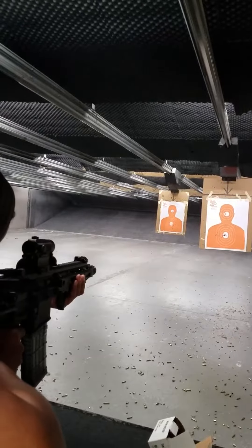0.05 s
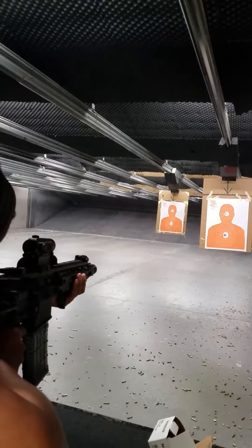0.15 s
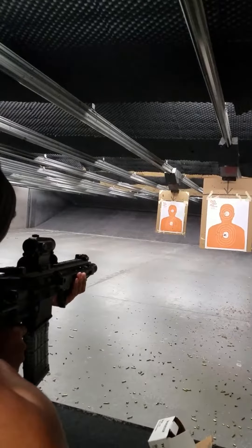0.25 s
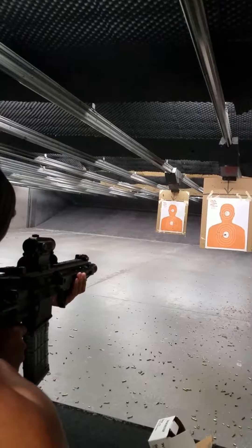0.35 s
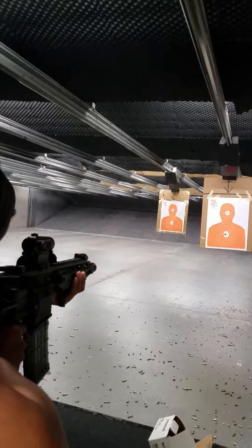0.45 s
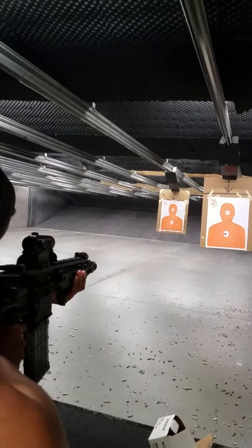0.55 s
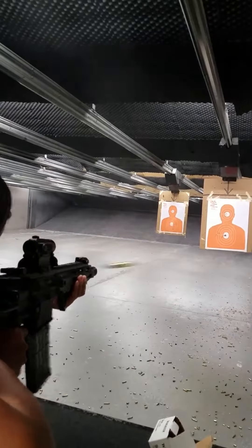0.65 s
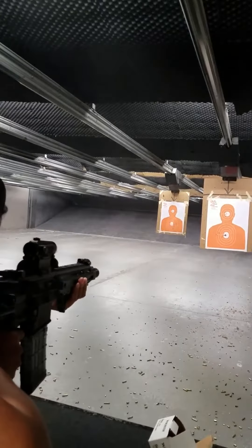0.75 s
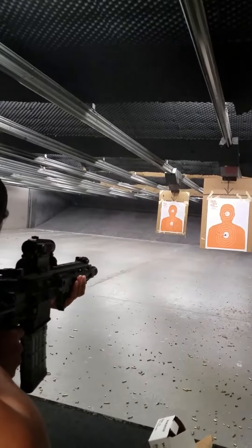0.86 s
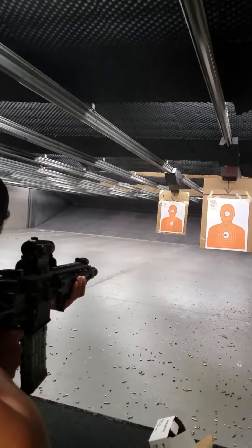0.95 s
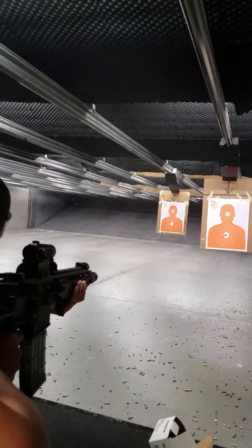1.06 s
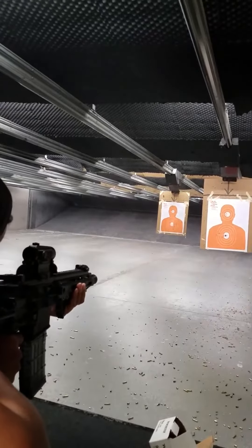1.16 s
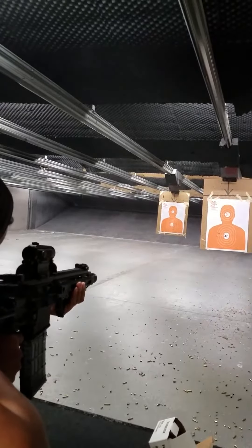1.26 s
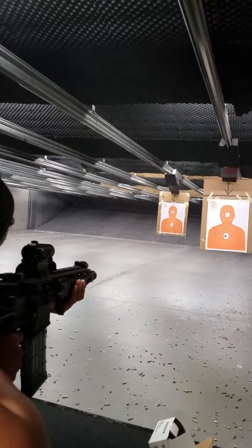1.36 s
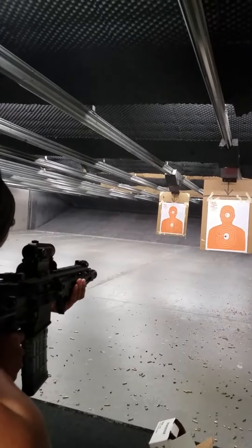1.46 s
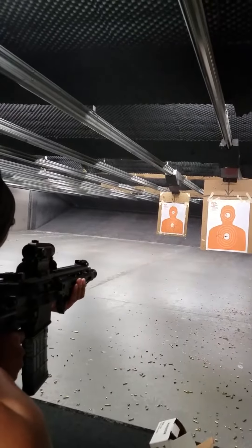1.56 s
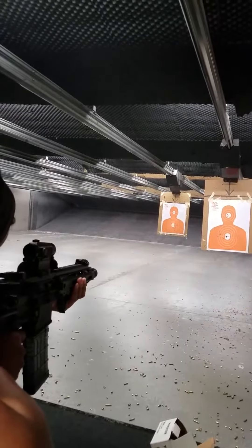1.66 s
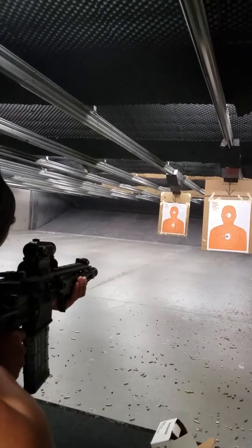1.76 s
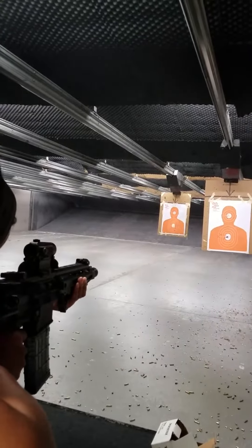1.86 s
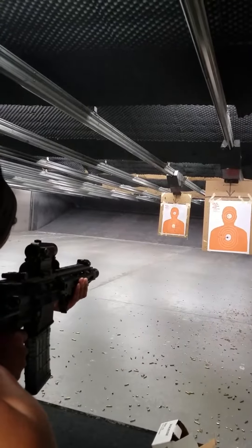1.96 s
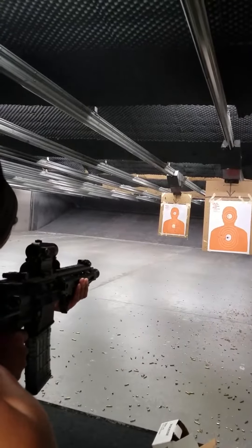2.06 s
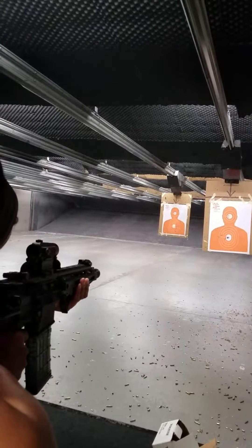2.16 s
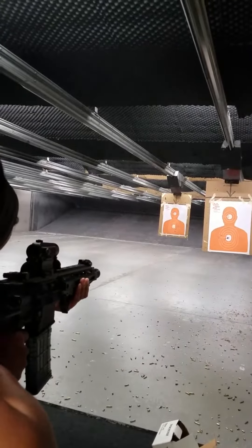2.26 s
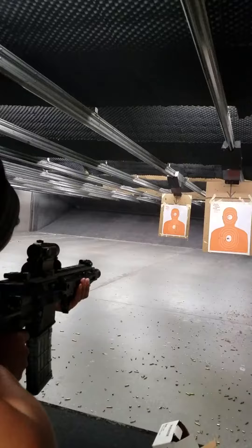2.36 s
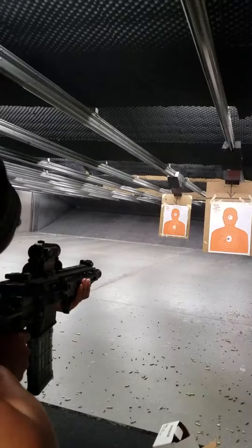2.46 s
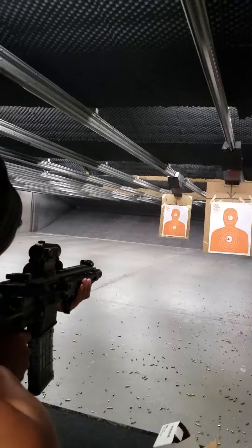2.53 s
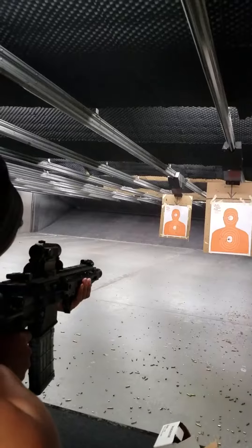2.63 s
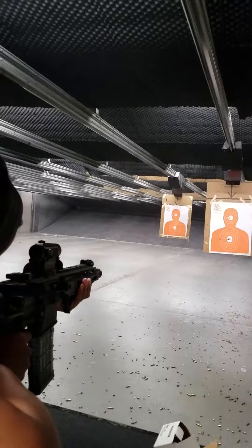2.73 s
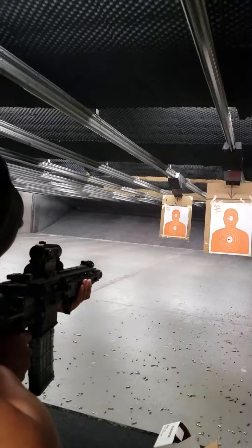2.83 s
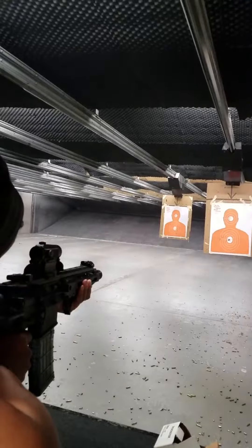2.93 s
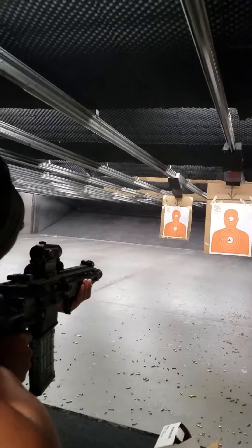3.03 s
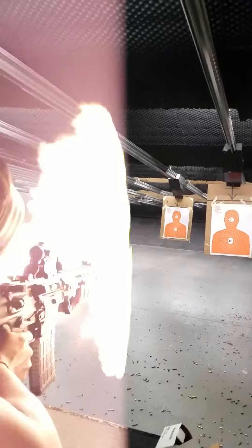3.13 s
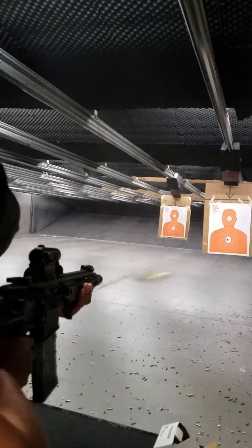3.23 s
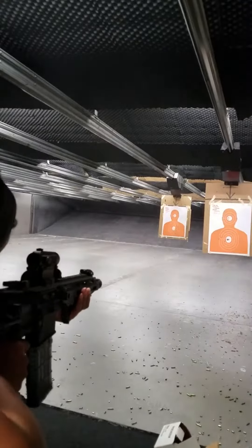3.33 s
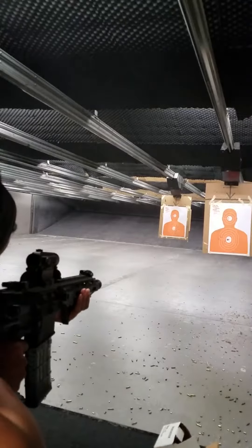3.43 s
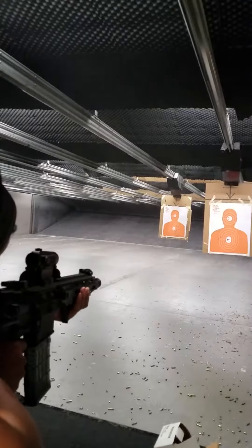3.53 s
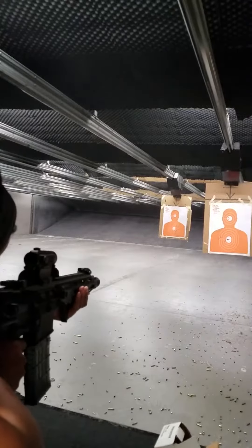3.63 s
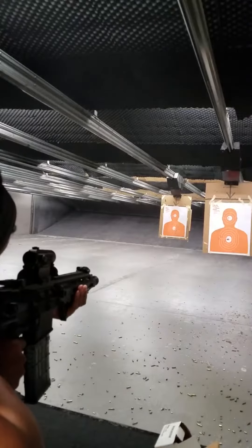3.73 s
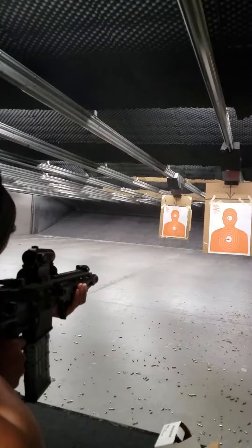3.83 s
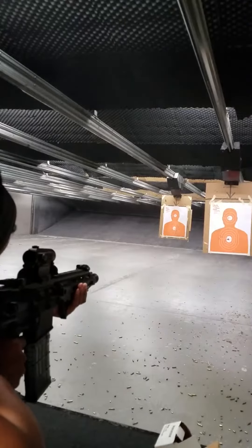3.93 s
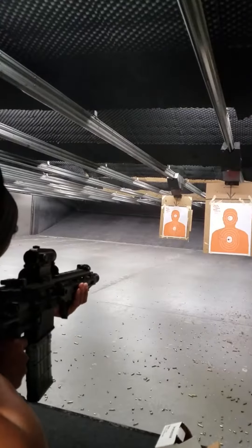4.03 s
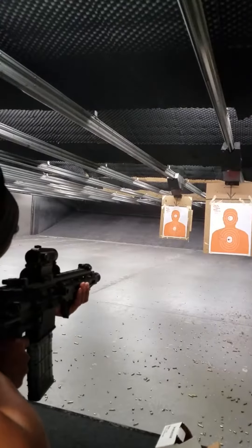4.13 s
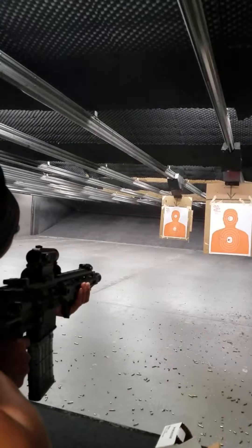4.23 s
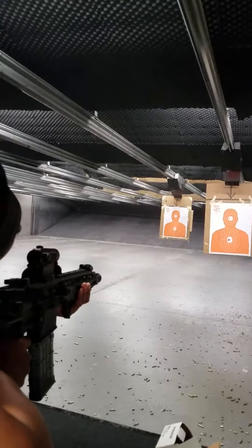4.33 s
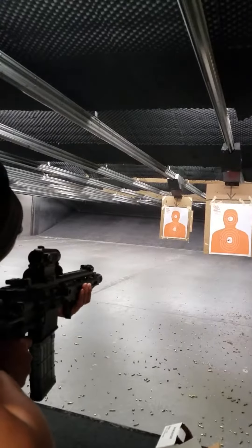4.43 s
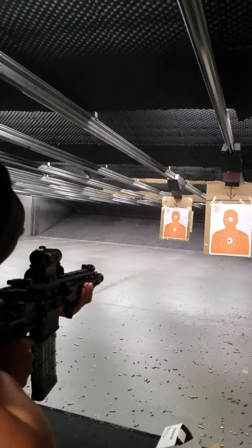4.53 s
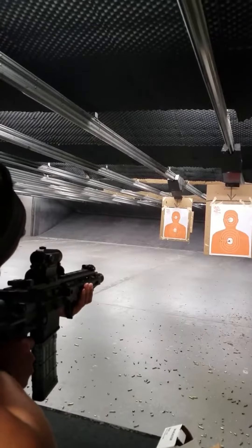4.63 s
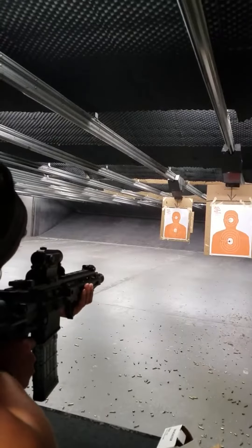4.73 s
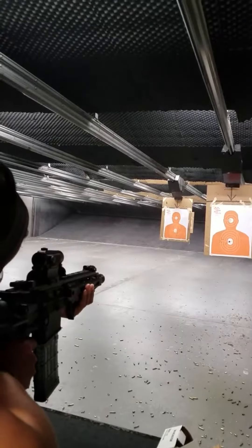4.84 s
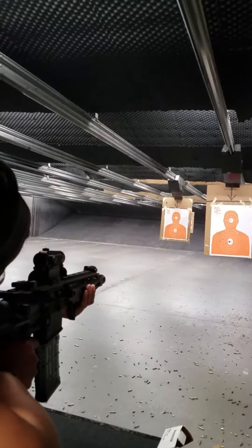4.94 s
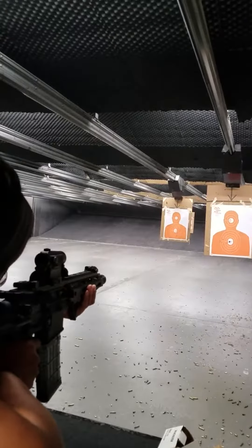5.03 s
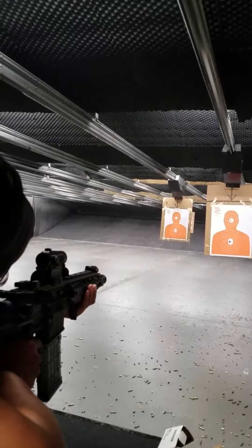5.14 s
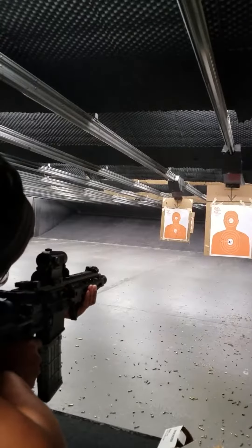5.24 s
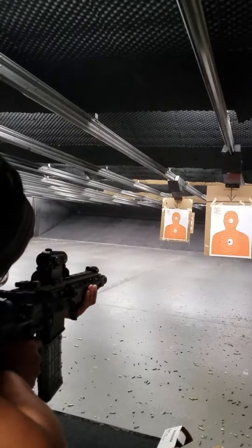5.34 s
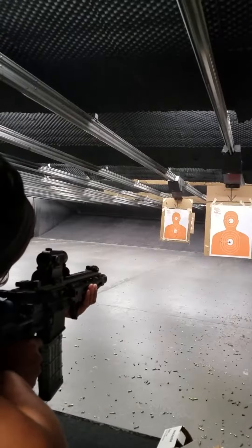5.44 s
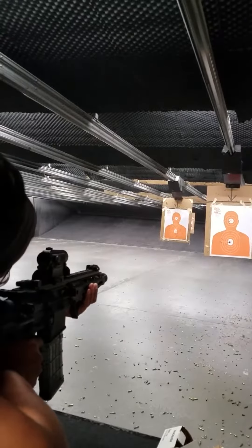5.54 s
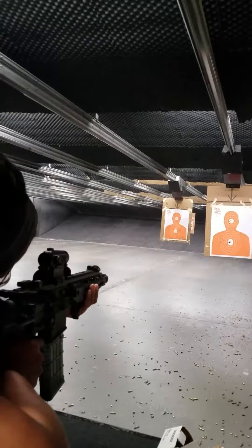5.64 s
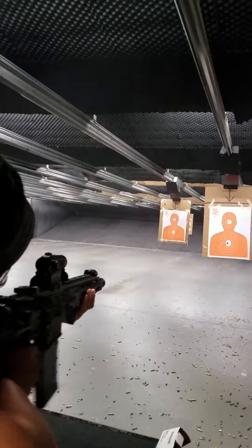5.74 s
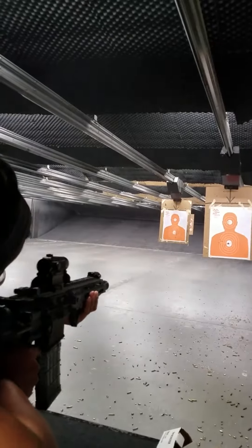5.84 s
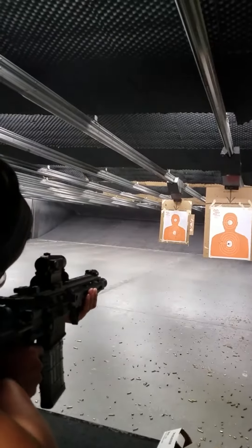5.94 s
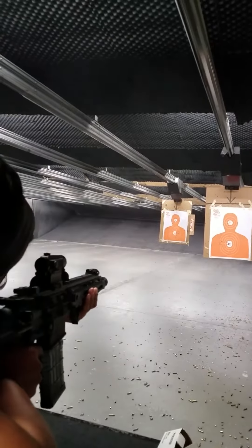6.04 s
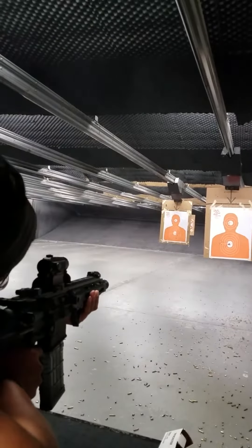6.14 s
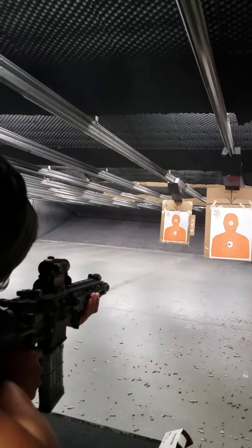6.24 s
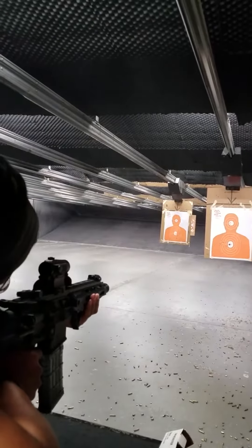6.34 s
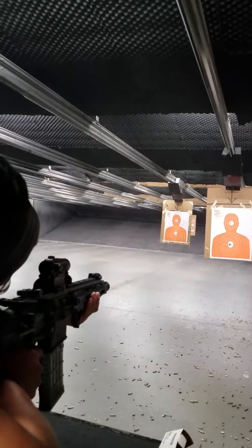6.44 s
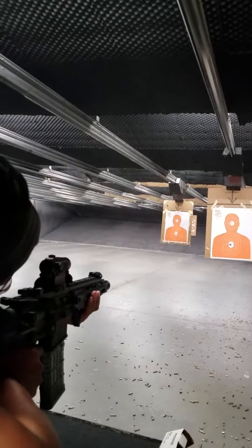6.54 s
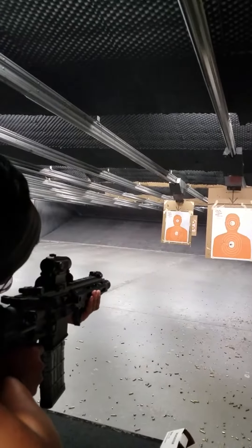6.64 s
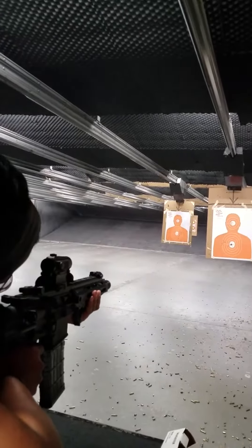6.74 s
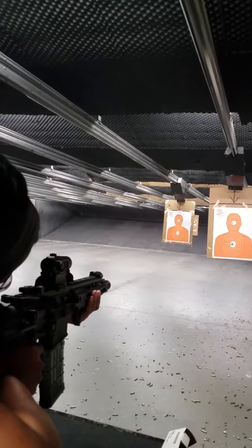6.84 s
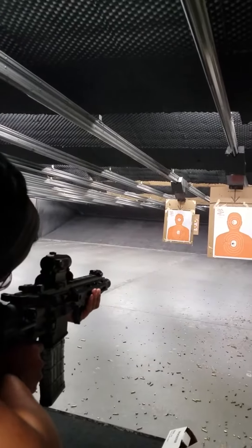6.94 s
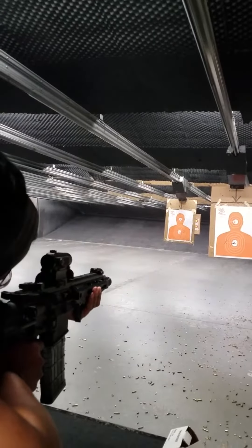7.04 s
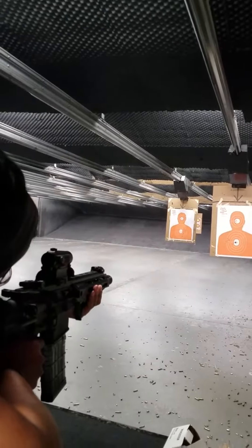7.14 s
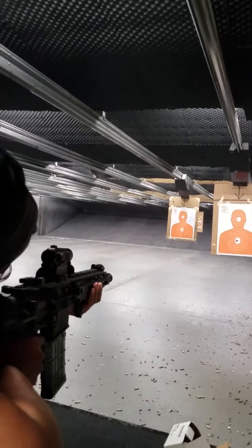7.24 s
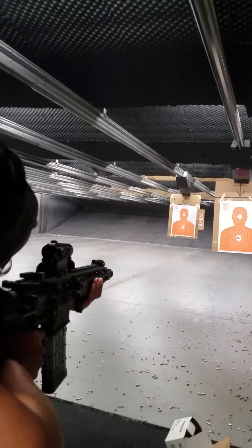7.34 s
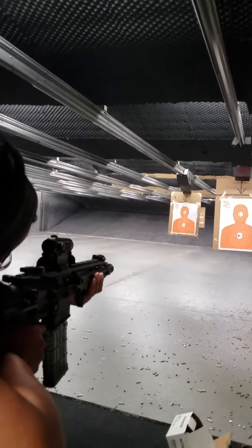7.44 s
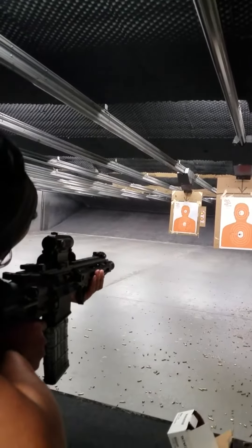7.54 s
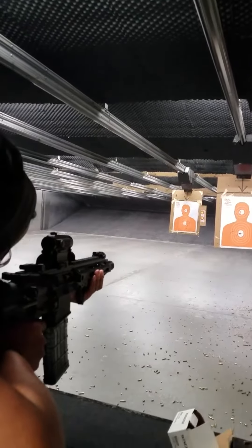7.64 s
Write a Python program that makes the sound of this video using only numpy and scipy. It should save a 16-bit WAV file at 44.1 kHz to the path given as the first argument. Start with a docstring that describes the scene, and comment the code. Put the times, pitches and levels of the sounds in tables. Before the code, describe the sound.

Single rifle-like shots fired well apart in an enclosed hall, overloaded and reverberant, followed by small gun clicks and spent cases ringing on concrete.

```python
"""Pistol shots in an indoor range

Three slow shots from a rifle-style pistol in a long concrete hall, heard from just behind the shooter.
Blast, echoes and steel are shaped, decaying noise; clacks are short noise bursts; brass cases ring as sines.
Each blast overloads the microphone and rolls down the hall; the gain control ducks, then lets the ringing
room and the ventilation, a fluttering noise, swell back."""
import sys
import numpy as np
from scipy import signal
from scipy.fft import rfft, irfft
from scipy.io import wavfile
from scipy.ndimage import uniform_filter1d, minimum_filter1d

SR = 44100
rng = np.random.default_rng(int(sys.argv[2]) if len(sys.argv) > 2 else 0)


def generate_wav(sig):
    """Save sig (samples, or channels by samples) to the path in sys.argv[1] as 16-bit PCM at SR."""
    pcm = np.round(np.clip(np.atleast_2d(sig).T, -1, 1) * 32767).astype(np.int16)
    wavfile.write(sys.argv[1], SR, pcm)


N = 338688
TIME = np.arange(N) / SR   # seconds
TAIL = TIME[:3 * SR]   # time span of a report and its reverberation
SHORT = TIME[:SR // 2]   # time span of a small contact

# The shots. Each row: start in seconds, strength in dB, extra bass in dB.
SHOTS = [(0.5205, 0.97, -1.5), (3.071, 0.27, 3), (5.602, 1, -1.5)]
# Muzzle blast scattered by the booth. Each row: frequency in Hz, relative level per Hz in dB.
BLAST_SPECTRUM = [(30, -10), (90, -15), (200, -8.5), (450, -1.5), (1000, 4.5), (1900, 4), (3600, -4.5),
                  (5500, -13), (7500, -11.5), (9500, -25), (12500, -15), (15500, -17.5)]
BLAST_DB, BLAST_T60_S, BLAST_LIKENESS = 20.5, 0.29, 0.1
# The blast and its returns from the ceiling baffles. Each row: delay in seconds, level in dB, rise in seconds.
BLAST_RETURNS = [(0, 0, 0.0026), (.108, -10, 0.0054), (.135, -7.5, 0.019), (.178, -12.5, .015),
                 (.262, -32, .005)]
# The direct shock front, a low punch and a sharp crack. Each row: frequency in Hz, relative level per Hz in dB.
SHOCK_SPECTRUM = [(40, -1), (150, -6), (330, 7.5), (1000, 4.5), (3000, -2.5), (7000, -5), (10000, -10.5),
                  (13500, -1.5), (16000, -9.5)]
SHOCK_DB, SHOCK_T60_S = 21.5, 0.15

# Reverberation of the hall. Each row: frequency in Hz, relative level per Hz in dB.
HALL_SPECTRUM = [(40, -29), (85, -22), (200, -16), (250, -11.5), (300, 0.5), (650, 1.5), (900, -4.5),
                 (1250, -3.5), (2200, -10), (4200, -14.5), (7300, -23.5), (9500, -34), (15000, -30.5)]
# Decay of the hall. Each row: frequency in Hz, time to fall by 60 dB in seconds.
HALL_T60 = [(60, 1.08), (150, 0.99), (330, 1.08), (600, 1.034), (1100, 1.466), (2200, 1.314), (4200, 1.043),
            (7500, 0.86), (14000, 0.55)]
# Standing waves between floor, ceiling and side walls. Each row: frequency in Hz, width in Hz,
# level over the reverberation in dB.
HALL_MODES = [(88, 12, -3.5), (147, 9, 13.5), (272, 9.9, 3), (347, 12, 2.5), (384, 12, -0.5), (473, 10, -5),
              (544, 14, -7), (578, 39, 1), (654, 21, 0)]
# Stereo spread of the hall. Each row: frequency in Hz, left-right likeness (correlation).
HALL_LIKENESS = [(60, 0.96), (300, 0.82), (600, 0.81), (1100, 0.58), (2200, 0.16), (4500, 0.037),
                 (14000, -0.43)]
HALL_DB, HALL_BUILD_S = 18.5, 0.15
HALL_REPEAT = 0.59   # power share of the echo pattern that all shots have in common
# The boom runs up and down the range and comes back in evenly spaced, ever shallower surges.
SURGE_FIRST_S, SURGE_EVERY_S, SURGE_DB, SURGE_T60_S = 0.095, 0.122, 3, 4.5
# The far end answers late with one broad swell.
SWELL_AT_S, SWELL_WIDTH_S, SWELL_DB = 0.4, 0.24, 3.5
# How strongly each band follows surges and swell. Each row: frequency in Hz, factor on their dB.
SURGE_SHARE = [(120, 2.7), (480, 0.78), (960, 0.14), (1900, 0.077), (4000, 0.44)]

# Steel rails and baffles that ring on after each shot. Each row: frequency in Hz, width in Hz, level in dB.
STEEL_MODES = [(590, 56, -4.5), (714.5, 58, 1), (800, 50, -3.5), (985, 48, -1.5), (1114, 67, 1.5),
               (1238, 71, -2), (1340, 91, -3), (1600, 260, -7.5)]
STEEL_DB, STEEL_T60_S, STEEL_LIKENESS = -9.5, 3.34, 0.75

# Trigger resets and knocks of the gun. Each row: start in seconds, click level in dB, thump level in dB.
CLACKS = [(1.144, -20, 1.5), (1.248, -32, -14), (3.681, -17, -15), (3.786, -17, -23), (6.182, -14, -10)]
# Steel click of the action. Each row: frequency in Hz, relative level per Hz in dB.
CLICK_SPECTRUM = [(800, -4), (2500, 20), (7000, -10), (9500, -24), (13000, -10), (16000, -11)]
# Dull thump of the gun body. Each row: frequency in Hz, relative level per Hz in dB.
THUMP_SPECTRUM = [(60, -49), (150, -34), (215, 6.5), (400, 3), (1200, -11.5), (3500, -20), (9000, -68)]
CLICK_T60_S, THUMP_T60_S = 0.087, 0.054

# Wall modes of three brass cases, one list per case. Each row: frequency in Hz, level in dB,
# time to fall by 60 dB in seconds.
CASES = [
    [(10600, -8.5, 0.3), (15000, -3, 0.24), (14950, -2, 0.18), (15450, -7, .14)],
    [(10930, -8, 0.5), (15150, 7, 0.29), (15710, -7, 0.3)],
    [(11000, -18, .5), (15270, 1, 0.31), (15560, 1, 0.52)],
]
# Hard landings of the cases on concrete. Each row: start in seconds, case number, ring level in dB,
# tick level in dB, other end's relative level in dB, first hop in seconds, loss per hop in dB.
LANDINGS = [(1.815, 0, -18, -23.5, -15, .209, 25), (2.102, 0, -50, -39, 2, 0.084, 12),
            (2.177, 0, -42.5, -43, 2, 0.053, 5), (2.5086, 0, -51, -58, -10, .18, 7),
            (6.502, 1, -38, -29, -6, 0.22, 13), (6.891, 1, -40, -44, -8, 0.076, 7),
            (6.961, 1, -32, -51, -4, 0.078, 3), (7.16, 1, -41, -37.5, -4, .128, 11),
            (7.4798, 2, -34.5, -30, -1.5, 0.18, 5.5)]
# Tick of brass on the floor. Each row: frequency in Hz, relative level per Hz in dB.
TICK_SPECTRUM = [(1500, -13), (4500, 2.5), (7200, 6.5), (9500, -8), (13000, -1), (15500, -3)]
TICK_T60_S = 0.038
HOP_SHARE = 0.48   # each hop lasts this share of the one before
OTHER_END_S = 0.015   # the second end of a case comes down just after the first
BRASS_PAN_DB = -2   # left minus right: the cases are thrown out to the right

# Ventilation. Each row: frequency in Hz, relative level per Hz in dB.
AIR_SPECTRUM = [(25, 8), (45, 1), (68, -0.5), (110, -4), (195, -7.5), (350, -2), (600, -1.5), (800, -1),
                (1080, -2.5), (1450, -2), (2700, -6.5), (5500, -18.5), (7700, -26), (9100, -37.5),
                (12500, -33), (15500, -39)]
# Stereo spread of the ventilation. Each row: frequency in Hz, left-right likeness (correlation).
AIR_LIKENESS = [(60, 0.91), (300, 0.84), (600, 0.79), (1100, 0), (2200, 0), (4500, 0.06), (14000, 0)]
AIR_DB = -34

# Microphone and gain control
LIMIT_DB, OVERLOAD_DB = 10, 13
AGC_CEILING_DB, HOLD_S, RELEASE_DB_PER_S = -7, 0.72, 64
BALANCE_DB = -1.3   # left minus right
CUTOFF_HZ = 15900


def gunfire():
    """The muzzle hardly moves, so most of the echo pattern repeats; each charge has its own weight."""
    out = np.zeros((2, N))
    colour = hall_colour()
    lasting = reflections(colour)
    for start_s, strength_db, bass_db in SHOTS:
        fresh = reflections(colour)
        echoes = np.sqrt(HALL_REPEAT) * lasting + np.sqrt(1 - HALL_REPEAT) * fresh
        report = blast() + roll(echoes) + steel()
        add(out, start_s, from_db(strength_db) * bass_shelf(report, bass_db))
    return out


def blast(clump_db=1.0, clump_s=0.007):
    """The bright crack fills the booth at once and comes back from the baffles in softer clusters."""
    power = 0
    for delay_s, db, rise_s in BLAST_RETURNS:
        since = TAIL - delay_s
        envelope = from_db(db) * fade(since, BLAST_T60_S) * np.clip(since / rise_s, 0, 1)
        power = power + envelope ** 2
    clumps_db = clump_db * wander(len(TAIL), clump_s * SR)
    scattered = noise(from_db(at_hz(BLAST_SPECTRUM, bins(TAIL))), BLAST_LIKENESS)
    out = from_db(BLAST_DB + clumps_db) * np.sqrt(power) * scattered
    shock = burst(SHOCK_SPECTRUM, SHOCK_T60_S, likeness=0.44, rise_s=0.0006)
    add(out, 0, from_db(SHOCK_DB) * shock)
    return out


def bass_shelf(x, gain_db, corner_hz=260):
    """A gentle shelf lifts or lowers the weight of a report under the corner."""
    lows = signal.sosfilt(signal.butter(1, corner_hz, fs=SR, output="sos"), x)
    return x + (from_db(gain_db) - 1) * lows


def hall_colour(ripple_db=1.5, ripple_hz=22):
    """A few strong standing waves, and countless weaker ones that ripple the spectrum."""
    hz = bins(TAIL)
    ripple = ripple_db * wander(len(hz), ripple_hz / hz[1])
    return from_db(at_hz(HALL_SPECTRUM, hz) + ripple) * np.sqrt(1 + humps(HALL_MODES, hz))


def reflections(colour):
    """Echoes of the hall are so dense that they amount to coloured noise."""
    return noise(colour, at_hz(HALL_LIKENESS, bins(TAIL)))


def roll(echoes, lumpy_db=2.17, lump_s=0.014):
    """The reverberation builds up, comes in surges and lumps, and each octave dies at its own rate."""
    spectrum = rfft(echoes)
    centres = np.geomspace(60, 15360, 9)   # octave steps
    surge_db = surges()
    together = wander(len(TAIL), lump_s * SR)   # lumps shared by all octaves
    out = 0
    for hz, own in zip(centres, np.eye(len(centres))):
        # a triangular band that crossfades into its neighbours
        band = irfft(spectrum * at_hz(np.c_[centres, own], bins(TAIL)))
        lumps_db = lumpy_db * (together + wander(len(TAIL), lump_s * SR)) / np.sqrt(2)
        level_db = surge_db * at_hz(SURGE_SHARE, hz) + lumps_db
        out = out + band * fade(TAIL, at_hz(HALL_T60, hz)) * from_db(level_db)
    return from_db(HALL_DB) * out * (1 - np.exp(-TAIL / HALL_BUILD_S))


def surges():
    """Rise and fall of the boom in dB: round trips of the range on top of one broad swell."""
    trips = np.cos(2 * np.pi * (TAIL - SURGE_FIRST_S) / SURGE_EVERY_S) * fade(TAIL, SURGE_T60_S)
    swell = np.exp(-((TAIL - SWELL_AT_S) / SWELL_WIDTH_S) ** 2)
    return SURGE_DB * trips + SWELL_DB * swell


def steel():
    """Clusters of plate modes, rendered as narrow noise bands, outlast the reverberation."""
    # the summed power of the modes serves as amplitude, which sharpens the peaks
    ringing = noise(humps(STEEL_MODES, bins(TAIL)), STEEL_LIKENESS)
    return from_db(STEEL_DB) * ringing * fade(TAIL, STEEL_T60_S) * (1 - np.exp(-TAIL / HALL_BUILD_S))


def action():
    """A steel click with a dull thump from the body of the gun."""
    out = np.zeros((2, N))
    for start_s, click_db, thump_db in CLACKS:
        click = burst(CLICK_SPECTRUM, CLICK_T60_S, likeness=0.2)
        thump = burst(THUMP_SPECTRUM, THUMP_T60_S, likeness=0.37, rise_s=0.0021)
        add(out, start_s, from_db(click_db) * click)
        add(out, start_s, from_db(thump_db) * thump)
    return out


def brass():
    """Each touch of the floor ticks and sets the case ringing."""
    out = np.zeros((2, N))
    for start_s, modes, ring_db, tick_db in touches():
        tick = burst(TICK_SPECTRUM, TICK_T60_S, likeness=0.09)
        add(out, start_s, from_db(tick_db) * tick + from_db(ring_db) * case_ring(modes))
    return out * sides(BRASS_PAN_DB)


def touches(count=3):
    """Every landing starts a run of ever shorter, softer hops; one end of the case hits, then the other."""
    for start_s, which, ring_db, tick_db, other_end_db, hop_s, loss_db in LANDINGS:
        modes = CASES[round(which)]
        for k in range(count):
            first_db = -k * loss_db
            second_db = other_end_db + first_db
            yield start_s, modes, ring_db + first_db, tick_db + first_db
            yield start_s + OTHER_END_S, modes, ring_db + second_db, tick_db + second_db
            start_s += hop_s * HOP_SHARE ** k


def case_ring(modes, scatter_db=1.5, spin_hz=24, spin_depth=0.6):
    """A struck case tumbles, so its modes throb differently at each side."""
    out = 0
    turns = spin_hz * rng.uniform(0.36, 2.1) * SHORT
    for hz, db, t60 in modes:
        strength = from_db(db + scatter_db * rng.standard_normal((2, 1)))
        facing = 1 + spin_depth * np.sin(2 * np.pi * (turns + rng.random((2, 1))))
        tone = np.sin(2 * np.pi * (hz * SHORT + rng.random((2, 1))))
        out = out + strength * facing * tone * fade(SHORT, t60)
    return out


def ventilation(flutter_db=0.5, flutter_s=0.081):
    """A steady, slightly fluttering rush of air swept down the lanes."""
    hz = bins(TIME)
    level_db = AIR_DB + flutter_db * wander(N, flutter_s * SR)
    return from_db(level_db) * noise(from_db(at_hz(AIR_SPECTRUM, hz)), at_hz(AIR_LIKENESS, hz))


def from_db(db):
    """Decibels to gain."""
    return 10 ** (np.asarray(db) / 20)


def at_hz(points, hz):
    """Read a table of frequency and value on a log-frequency axis."""
    known_hz, values = np.transpose(points)
    return np.interp(np.log(np.maximum(hz, 1)), np.log(known_hz), values)


def bins(t):
    """Frequencies of the spectrum of a sound that lasts as long as t."""
    return np.arange(len(t) // 2 + 1) * SR / len(t)


def humps(modes, hz):
    """Summed power response of resonances given by frequency, width and level."""
    return sum(from_db(db) ** 2 / (1 + (2 * (hz - centre) / width) ** 2) for centre, width, db in modes)


def noise(shape, likeness):
    """Stereo noise of rms 1 with the given amplitude spectrum and left-right likeness."""
    mid, side = rfft(rng.standard_normal((2, 2 * len(shape) - 2)))
    alike = np.clip(likeness, -0.99, 0.99)
    stereo = np.sqrt(1 + alike) * mid + np.sqrt(1 - alike) * side * [[1], [-1]]
    x = irfft(shape * stereo)
    return x / x.std()


def wander(size, step):
    """A random zigzag with a spread of about 1 and a new corner every step points."""
    knots = rng.standard_normal(4096)
    # 1.2 makes up for the spread lost between the corners
    return 1.2 * np.interp(np.arange(size) / step, np.arange(len(knots)), knots)


def fade(t, t60):
    """Exponential decay from t = 0 that falls by 60 dB in t60 seconds; silent before."""
    return (t >= 0) * np.exp(-np.log(1000) * np.maximum(t, 0) / t60)


def burst(spectrum, t60, likeness, rise_s=0.00016):
    """A short impulse, smeared by nearby surfaces into dying noise."""
    body = noise(from_db(at_hz(spectrum, bins(SHORT))), likeness)
    return body * fade(SHORT, t60) * (1 - np.exp(-SHORT / rise_s))


def add(out, start_s, sound):
    """Mix a sound in at its start time."""
    start = round(start_s * SR)
    out[:, start:start + sound.shape[-1]] += sound[..., :max(N - start, 0)]


def sides(pan_db):
    """Gains of the two channels for a left-minus-right level difference."""
    return from_db(pan_db / 2 * np.array([[1], [-1]]))


def scene():
    """Everything that reaches the firing point."""
    return gunfire() + action() + brass() + ventilation()


def short_power(x, window_s):
    """Mean power of both channels in a short window around each moment."""
    return uniform_filter1d(np.mean(x ** 2, axis=0), round(window_s * SR))


def limiter(x):
    """A fast, soft limiter rides the loudest part of each report."""
    power = short_power(x, window_s=0.012)
    return x / np.sqrt(1 + np.maximum(power, 0) / from_db(LIMIT_DB) ** 2)


def overload(x, low_cut_hz=62, turn_hz=1800):
    """The remaining peaks saturate; a bass cut and a phase shift make the flattened tops spiky again."""
    top = from_db(OVERLOAD_DB)
    flat = top * np.tanh(x / top)
    pole = np.exp(-2 * np.pi * turn_hz / SR)
    turned = signal.lfilter([-pole, 1], [1, -pole], flat)   # all-pass: only the phase moves
    return signal.sosfilt(signal.butter(2, low_cut_hz, "high", fs=SR, output="sos"), turned)


def gain_control(x):
    """The gain drops at once on a loud sound, holds, then climbs back steadily."""
    power = short_power(x, window_s=0.011)
    gain_db = np.minimum(AGC_CEILING_DB - 10 * np.log10(np.maximum(power, 1e-12)), 0)
    half = round(HOLD_S * SR / 2)
    # lowest gain of the past hold time
    held_db = minimum_filter1d(gain_db, 2 * half + 1, origin=half, mode="nearest")
    # a running minimum against a rising ramp limits the climb in dB per second
    climb_db = RELEASE_DB_PER_S * TIME
    return x * from_db(np.minimum.accumulate(held_db - climb_db) + climb_db)


def record(dry):
    """Limiter, overload, gain control, a slightly louder right side, full-scale clipping and the top cut."""
    levelled = gain_control(overload(limiter(dry)))
    clipped = np.clip(levelled * sides(BALANCE_DB), -1, 1)
    return signal.sosfilt(signal.ellip(10, 0.1, 70, CUTOFF_HZ, fs=SR, output="sos"), clipped)


dry = scene()
out = record(dry)
generate_wav(out)
```